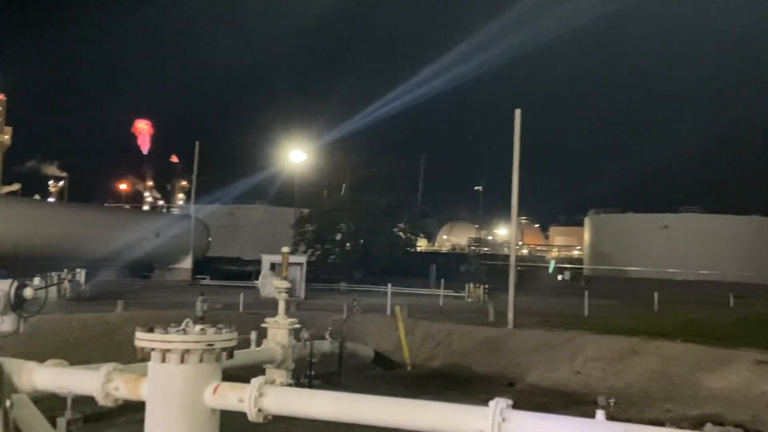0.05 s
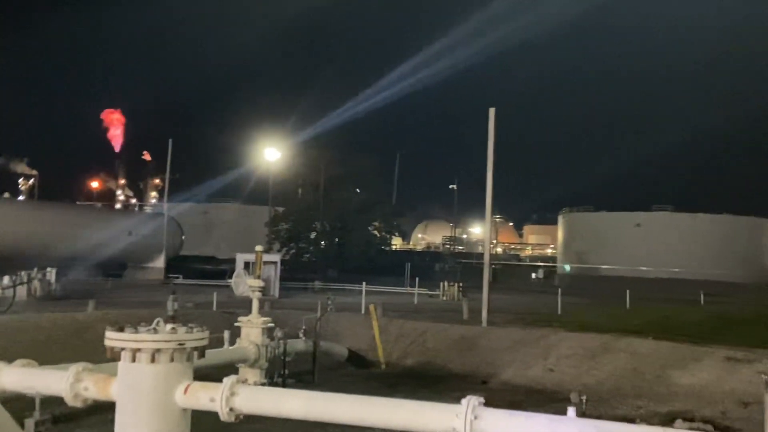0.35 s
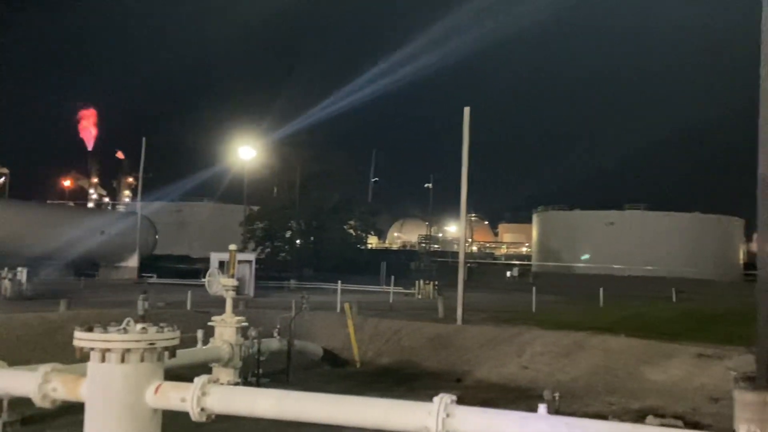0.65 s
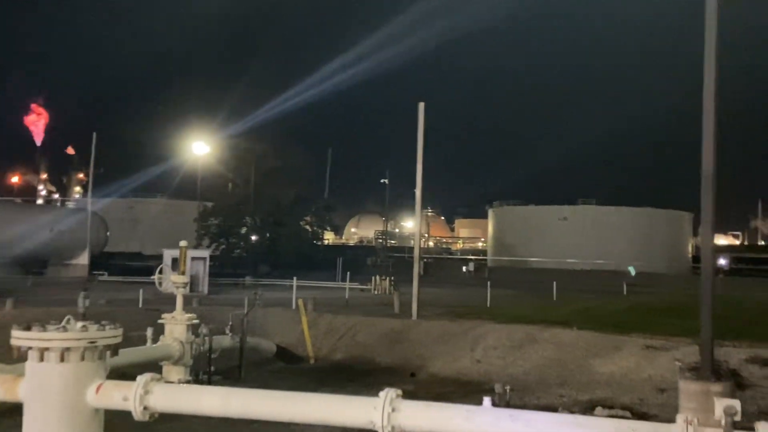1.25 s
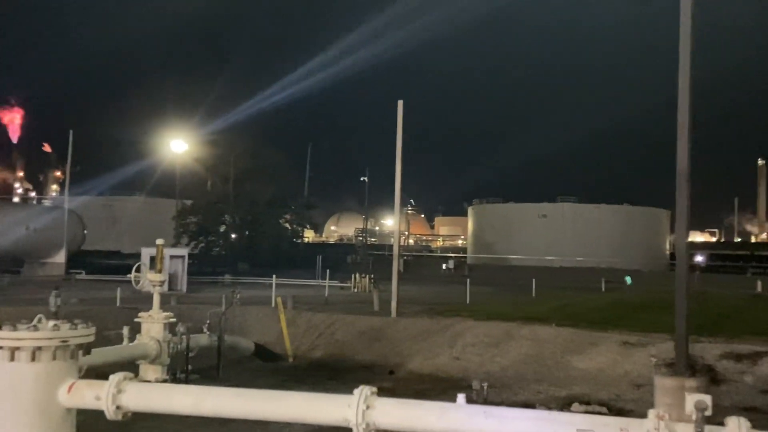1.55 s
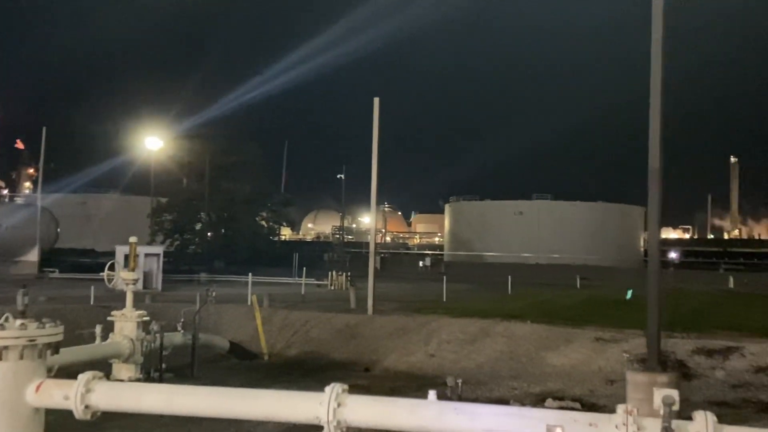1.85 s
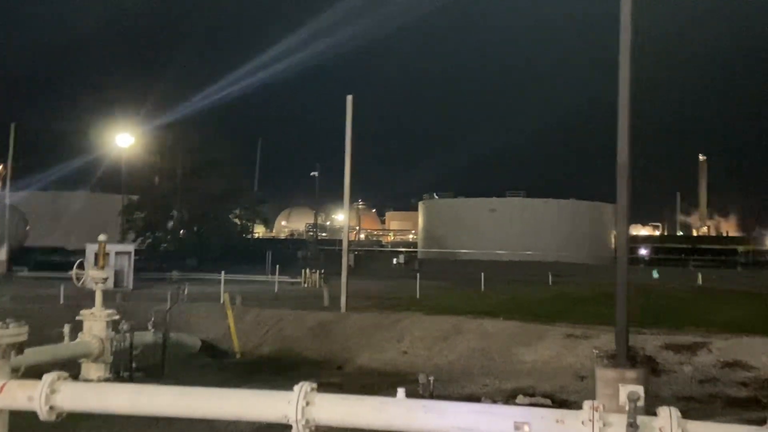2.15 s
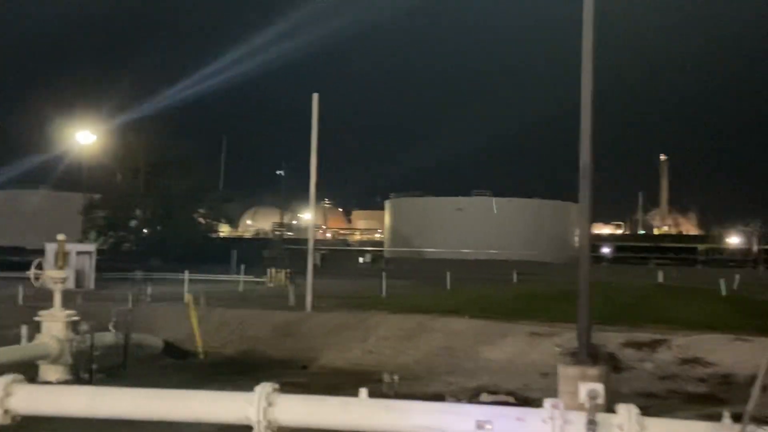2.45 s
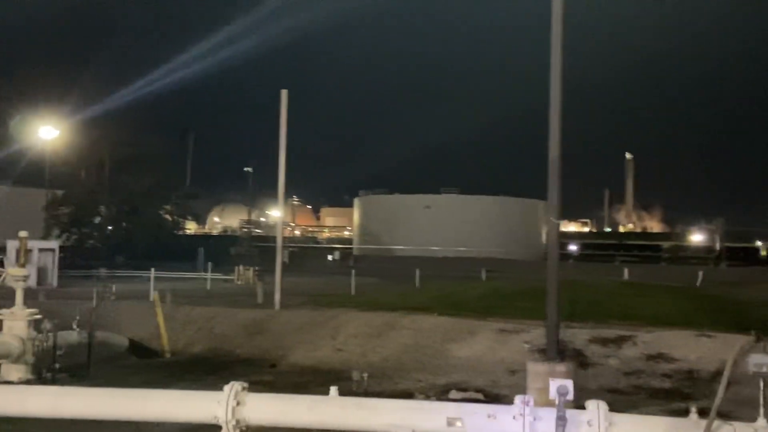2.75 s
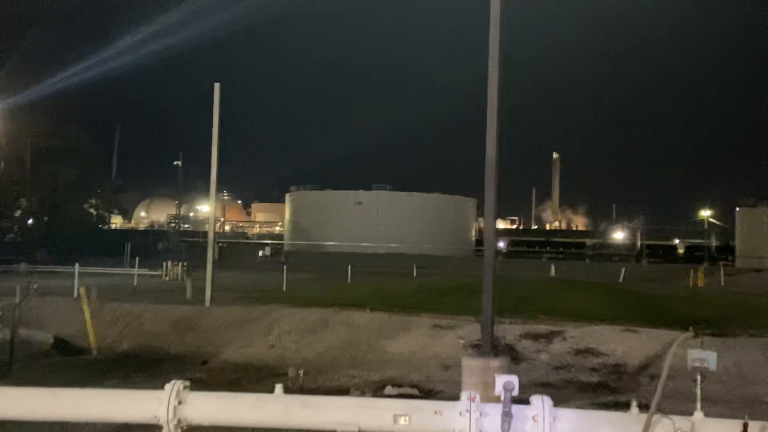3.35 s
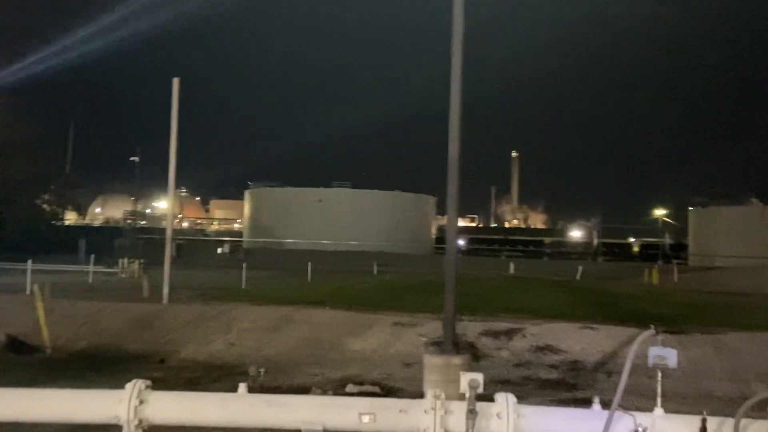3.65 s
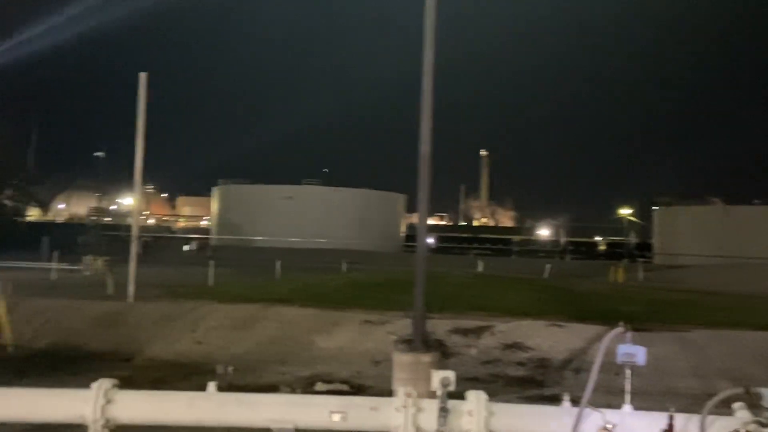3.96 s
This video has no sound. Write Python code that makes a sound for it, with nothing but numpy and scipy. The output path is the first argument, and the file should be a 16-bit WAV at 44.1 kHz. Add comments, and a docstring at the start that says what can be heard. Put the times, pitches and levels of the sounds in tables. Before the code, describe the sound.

A distant gas flare rumbles and throbs throughout, outdoors at an industrial plant. Far fans rush, machines hum and gas hisses with faint whistles, the hiss easing slightly as the hand-held phone turns away.

```python
"""A deep, throbbing rumble comes first: a distant gas flare burning over an industrial plant at night.
With it, all the way through, come a broad wash of far burners and fans, the hum of spinning machines,
and the hiss of gas under pressure, which whistles faintly in pipes and valves.
We listen outdoors through a hand-held phone. It turns slowly to the right, away from the flare,
so the wash, the hiss and most whistles fade a little while a valve on the right grows louder."""
import sys
import numpy as np
from scipy import signal
from scipy.fft import rfft, irfft
from scipy.io import wavfile
from scipy.ndimage import uniform_filter1d

SR = 44100
rng = np.random.default_rng(int(sys.argv[2]) if len(sys.argv) > 2 else 0)


def persist_wave(psi):
    """Save psi, clipped to +-1, as 16-bit WAV."""
    counts = np.round(np.clip(psi, -1, 1) * 32767).astype(np.int16)
    wavfile.write(sys.argv[1], SR, np.atleast_2d(counts).T)


N = 176400
TIME_S = np.arange(N) / SR
FREQ_HZ = np.maximum(np.arange(N // 2 + 1) * SR / N, 1)


def gain(db):
    """Turn decibels into a number to multiply by."""
    return 10 ** (np.asarray(db) / 20)


def set_level(sound, db):
    """Scale a stereo sound so the mean of left and right has this average (rms) level."""
    return sound * gain(db) / np.sqrt(np.mean(sound.mean(axis=0) ** 2))


def over_pitch(table, column=1):
    """Join a table's points into a curve from low to high pitch."""
    rows = np.array(table, float)
    return np.interp(np.log(FREQ_HZ), np.log(rows[:, 0]), rows[:, column])


def over_time(table, column=1):
    """Join a table's points into a curve from start to end."""
    rows = np.array(table, float)
    return np.interp(TIME_S, rows[:, 0], rows[:, column])


def noise():
    """The spectrum of white noise: every pitch about equally strong."""
    return rfft(rng.standard_normal(N))


def wander(rate_hz):
    """A random drift, typically 1 in size, moving at up to about this rate."""
    drift = irfft(noise() * np.exp(-(FREQ_HZ / rate_hz) ** 2), N)
    return (drift - drift.mean()) / drift.std()


def below(sound, hz, steepness=8):
    """Keep the part of a sound under this pitch."""
    return irfft(rfft(sound) / (1 + (FREQ_HZ / hz) ** steepness), N)


# How the phone's two microphones differ: pitch_hz, spread_db, left_lead_rad, left_minus_right_db
MIC_PAIR = [(60, -28.5, 0, -0.9), (120, -21, 0.1, 1.5), (250, -11.5, 0.0039, 0.1), (350, -11, 0, 0.9),
            (517, -7, 0.66, 2.4), (865, -6, 0.61, 4), (1490, -5.5, 1.3, -3.5), (1750, -2, 0.75, 3),
            (2070, -8, .1, 0), (2600, -15, 0.013, -0.5), (3300, -30.5, 0, 0.5), (4000, -58, 0, 0)]

def stereo_noise(shape):
    """A shaped noise spectrum at both microphones: alike in the bass, less alike in the middle."""
    sign = np.array([[1], [-1]])  # left, right
    spread = gain(over_pitch(MIC_PAIR, 1))
    lead, balance_db = over_pitch(MIC_PAIR, 2), over_pitch(MIC_PAIR, 3)
    shared = noise() * np.exp(.5j * sign * lead)
    pair = shared + sign * spread * noise()
    return pair * shape * gain(sign * balance_db / 2) / np.hypot(np.cos(lead / 2), spread)


def even_out(sound, share=.3, window_s=.03):
    """Smooth away part of a noise's quick rises and dips."""
    outline = np.abs(signal.hilbert(sound.mean(axis=0)))
    power = uniform_filter1d(outline ** 2, int(window_s * SR))
    return sound / power ** (share / 2)


# The flame's tone, from low to high: pitch_hz, relative_db
FLARE_TONE = [(20, -39.5), (30, -20), (41, -9), (49, 7.9), (58, -9), (70, -2), (88, 1), (105, -7),
              (132, -6), (155, -16.5), (185, -26.5), (400, -38.5), (1000, -98.5)]
# How the rumble swells and sinks: time_s, relative_db
FLARE_SWELLS = [(0, -3.4), (.6, 2.1), (1.0, 0.5), (1.17, -2), (1.4, 1), (1.75, -1.5), (2.2, 2.6),
                (2.6, -2.5), (2.8, -0.5), (3.1, 0.4), (3.6, -0.5), (4, 1.5)]

def flare_rumble():
    """Swirling, burning gas makes a deep rumble that slowly swells and sinks."""
    rumble = irfft(stereo_noise(gain(over_pitch(FLARE_TONE))), N)
    return set_level(even_out(rumble) * gain(over_time(FLARE_SWELLS)), db=-20)


# The rumble's strongest throbs: peak_s, relative_db, pitch_hz, length_s
RUMBLE_THROBS = [(0.157, 8, 66, 0.018), (0.332, 5.5, 60, 0.029), (0.454, 2, 90, 0.018), (.54, 3, 85, 0.024),
                 (0.592, -3.5, 118, 0.035), (.662, 5.5, 71, .027), (0.778, 2, 63, 0.041),
                 (0.963, 5.5, 69.4, 0.022), (1.347, 2.5, 68, 0.053), (1.547, -4, 69.4, 0.016),
                 (1.786, 3, 75, 0.016), (1.89, -0.5, 112, 0.069), (1.958, 7, 67, 0.018),
                 (2.157, 8.5, 80, 0.039), (2.25, 1.5, 92, 0.015), (2.341, 5.5, 70, 0.056),
                 (2.493, 5, 63, 0.037), (2.587, 4, 61, 0.044), (2.7, 4.5, 77.4, 0.028),
                 (2.862, 4.5, 72, 0.029), (3.007, 8.5, 69, 0.024), (3.168, 6, 67, 0.038),
                 (3.348, 5.5, 70.4, 0.041), (3.548, 6.5, 76, 0.037), (3.681, 9.5, 70, 0.021)]

def add_throbs(rumble, base_db=-18.6, takeover=.8):
    """The rumble gathers into short, low notes, each replacing most of its deep bass for a moment."""
    deep = below(rumble, hz=102)
    phases = rng.uniform(0, 2 * np.pi, len(RUMBLE_THROBS))
    for (peak_s, relative_db, pitch_hz, length_s), phase in zip(RUMBLE_THROBS, phases):
        from_peak_s = TIME_S - peak_s
        swell = np.exp(-2 * np.log(2) * (from_peak_s / length_s) ** 2)
        note = gain(base_db + relative_db) * np.sin(2 * np.pi * pitch_hz * from_peak_s + phase)
        rumble = rumble + swell * (note - takeover * deep)
    return rumble


def through_air(spectrum, bands=9, waver_db=.44, flicker_db=.5):
    """Moving air makes far sound waver as a whole, while each octave also flickers on its own."""
    waver = waver_db * wander(rate_hz=3)
    octave = np.clip(np.log2(FREQ_HZ / 50), 0, bands - 1)
    out = 0
    for k in range(bands):
        band = irfft(spectrum * np.maximum(1 - np.abs(octave - k), 0), N)
        out = out + band * gain(waver + flicker_db * wander(rate_hz=13))
    return out


# Level changes as the phone turns and the air wavers: time_s, low_wash_db, high_wash_db, hiss_db
PHONE_TURN = [(0, 0.5, 1, 1), (0.302, 1.5, 2, 1.7), (0.572, 2, 2.5, 2.1), (0.751, -1, .8, 1.5),
              (1.05, 1.2, 0.2, 1.6), (1.2, 1, -0.5, 0.6), (1.351, 1, 1.7, 1.5), (1.62, 1, 1, -.4),
              (1.918, 1.2, -0.4, 0), (2.081, -1.3, 0, -1.3), (2.25, -0.8, 0.5, -0.5),
              (2.651, 1.2, -1.5, -1.5), (3.05, 0.5, -1, -2), (3.35, 0, -2.1, -1.7), (3.581, -1.5, -1, -2.5),
              (4, -0.8, -0.5, -3)]

def turn_gain(part):
    """How much the phone's turn and the air lift or lower one part of the sound."""
    column = {"low wash": 1, "high wash": 2, "hiss": 3}[part]
    return gain(over_time(PHONE_TURN, column))


# The tone of far burners and fans: pitch_hz, relative_db
WASH_TONE = [(100, -8), (190, -2), (260, 0.5), (360, 1.46), (450, 0), (560, -5.5), (730, -6.5),
             (850, -10.5), (1000, -10), (1250, -14), (1600, -16), (1850, -18.5), (2020, -23), (3000, -36),
             (6000, -91.5)]

def plant_wash():
    """Far burners and fans blur into one wavering rush; the turn dulls mostly its upper part."""
    wash = through_air(stereo_noise(gain(over_pitch(WASH_TONE))))
    low = below(wash, hz=750, steepness=4)
    high = wash - low
    return set_level(low * turn_gain("low wash") + high * turn_gain("high wash"), db=-27.5)


# The notes of the machines: pitch_hz, wander_hz, level_db, left_lead_rad
MACHINE_NOTES = [(71, 5, -35, 0), (358, 2.5, -44, 1.1), (478, 2.4, -40.5, .7), (737, 12, -51, .6)]

def machine_hum(fade_db=4.0):
    """Spinning machines hum notes that drift a little in pitch and fade in and out."""
    out = 0
    for pitch_hz, wander_hz, level_db, lead in MACHINE_NOTES:
        drifting_hz = pitch_hz + wander_hz / 2 * wander(wander_hz)
        phase = 2 * np.pi * np.cumsum(drifting_hz) / SR
        note = np.sin(phase + np.array([[lead], [-lead]]) / 2)
        out = out + set_level(note * gain(fade_db * wander(rate_hz=3)), level_db)
    return out


# The tone of the hissing gas: pitch_hz, relative_db
HISS_TONE = [(900, -7.5), (1700, -1), (1860, -1.3), (2020, -5), (2170, -1.1), (2550, 1), (2770, -0.5),
             (3120, 0.5), (3500, -2.5), (4100, -6), (4420, -7.5), (4600, -6.5), (5200, -12), (6200, -18.5),
             (7200, -24), (8200, -31), (9000, -89)]

def gas_hiss():
    """Gas under pressure hisses. Its thin top comes from all round, so only the rest fades in the turn."""
    hiss = through_air(stereo_noise(gain(over_pitch(HISS_TONE))))
    hiss = set_level(hiss, db=-41.5)
    body = below(hiss, hz=5500)
    sizzle = hiss - body
    return body * turn_gain("hiss") + sizzle


def whistle(pitch_hz, width_hz, level_db):
    """Flowing gas makes a pipe or valve ring: noise squeezed around one pitch."""
    peak = 1 / (1 + ((FREQ_HZ - pitch_hz) / width_hz) ** 2)
    return set_level(irfft(stereo_noise(peak), N), level_db)


# Ringing pipes and valves: pitch_hz, width_hz, halfway_level_db, fade_db_per_s
PIPE_WHISTLES = [(985, 45, -50.5, 1), (1390, 55, -54.5, .5), (1660, 55, -56, 2.5), (1790, 40, -55.5, 2),
                 (2880, 20, -58.5, .5), (3391, 14, -61.5, 1.8), (3482, 12, -63.5, 1.5),
                 (3645, 35, -64.5, 1.2), (4720, 32, -62, 2), (4856, 7, -68.5, 1.2), (5193, 5, -72, .8)]

def pipe_whistles():
    """Gas whistles faintly in the pipework, fading as the phone turns away."""
    from_halfway_s = TIME_S - TIME_S.mean()
    out = 0
    for pitch_hz, width_hz, level_db, fade_db_per_s in PIPE_WHISTLES:
        out = out + whistle(pitch_hz, width_hz, level_db) * gain(-fade_db_per_s * from_halfway_s)
    return out


# The loudest whistle's rise and fall: time_s, level_db
FADING_VALVE = [(0, -50), (.18, -49.5), (.42, -51), (.7, -55), (.88, -46), (1.08, -52), (2.0, -54),
                (2.4, -57), (4, -58.5)]

def fading_valve():
    """The loudest whistle dips, swells, then fades as the phone turns from its valve."""
    return whistle(pitch_hz=2993, width_hz=28, level_db=0) * gain(over_time(FADING_VALVE))


# The whistles of the valve on the right: pitch_hz, width_hz, end_level_db
RISING_VALVE = [(2420, 32, -51), (2150, 150, -51.5)]

def rising_valve(rise_db_per_s=3.5):
    """Another valve's whistles grow louder as the phone turns towards it."""
    rise = gain(rise_db_per_s * (TIME_S - TIME_S[-1]))
    return sum(whistle(*row) for row in RISING_VALVE) * rise


def scene():
    """The flare, the plant, the machines and the gas all sound together."""
    flare = add_throbs(flare_rumble())
    plant = plant_wash() + machine_hum()
    gas = gas_hiss() + pipe_whistles() + fading_valve() + rising_valve()
    return flare + plant + gas


# The tone of a very faint, high hiss: pitch_hz, relative_db
HIGH_HISS_TONE = [(5000, -11.5), (11500, 2.5), (13500, -4.5), (15500, -12.5)]

def record(dry, top_hz=15500):
    """A very faint, high hiss joins in, and the phone cuts off the highest treble."""
    high_hiss = irfft(np.array([noise(), noise()]) * gain(over_pitch(HIGH_HISS_TONE)), N)
    treble_cut = signal.ellip(8, .2, 70, top_hz, fs=SR, output="sos")
    return signal.sosfilt(treble_cut, dry + set_level(high_hiss, db=-75.5))


dry = scene()
out = record(dry)
persist_wave(out)
```